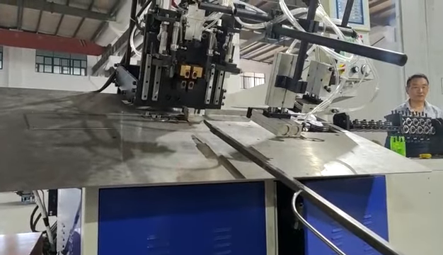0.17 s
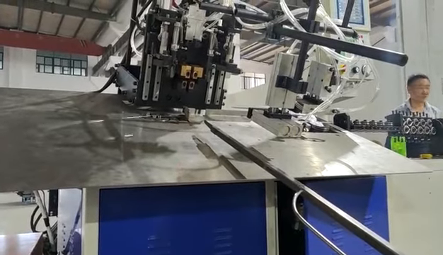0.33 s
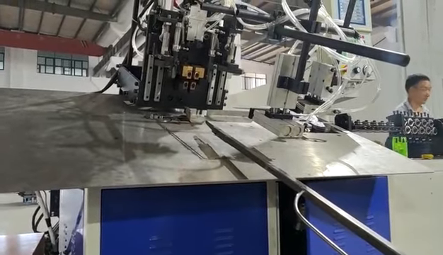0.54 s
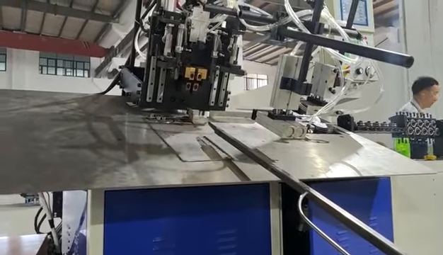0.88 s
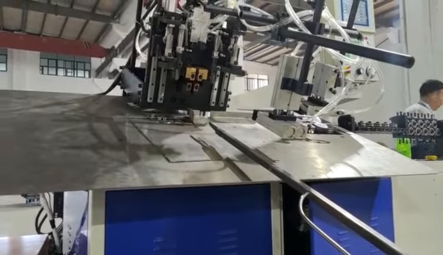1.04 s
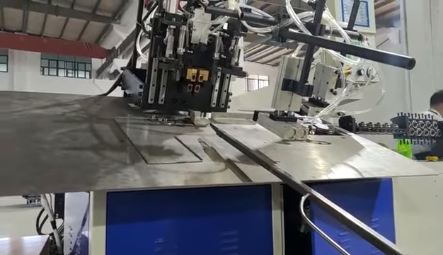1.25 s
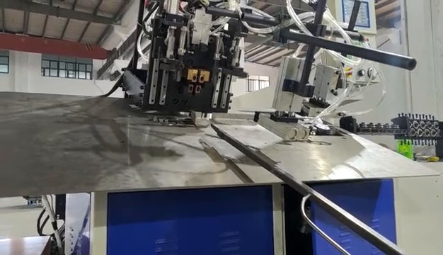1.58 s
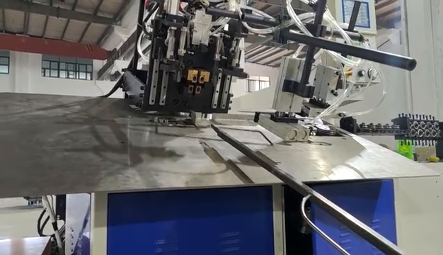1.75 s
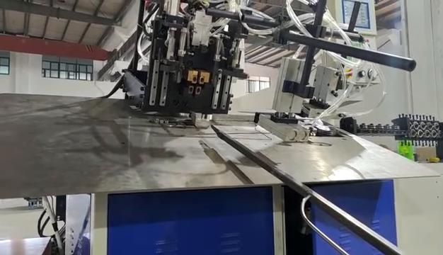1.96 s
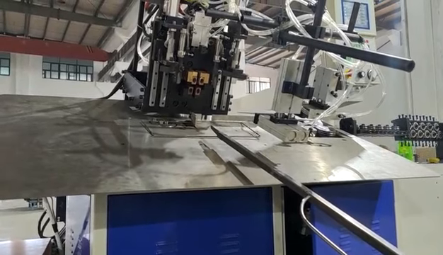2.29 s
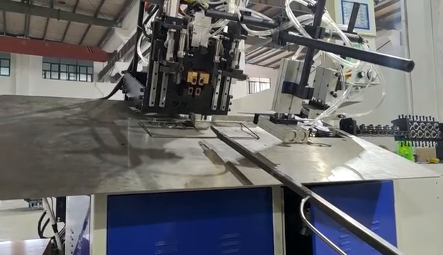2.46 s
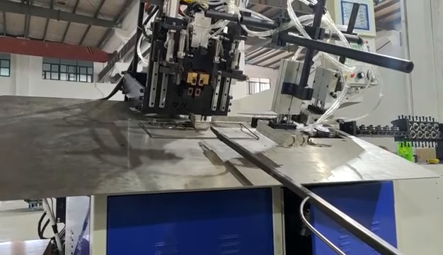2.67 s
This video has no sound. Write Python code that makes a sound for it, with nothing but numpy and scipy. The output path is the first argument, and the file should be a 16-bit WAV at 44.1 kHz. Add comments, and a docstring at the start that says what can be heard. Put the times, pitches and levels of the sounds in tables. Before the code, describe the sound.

Steel parts clink and heads rattle lightly over a low factory drone; after a calmer stretch the bending machine clanks hard and repeatedly, motors hum briefly, and a buzzing air exhaust whistles downward, heard fairly close in stereo.

```python
"""A large factory hall, where a wire bending machine works a few metres from a small stereo microphone.
Shaped noise and fuzzy hums make the hall's drone, and faint scattered rings its far clatter; filtered noise
is the hiss of compressed air, and narrow noise bands are the drive motors. Small steel parts clink as decaying
sines, and the heads clank against their stops as rattles through the frame's resonances over low thuds. At
the end an exhaust jet, a falling band of noise, whistles downward while the frame buzzes."""
import sys
import numpy as np
from scipy import signal
from scipy.fft import rfft, irfft
from scipy.io import wavfile
from scipy.ndimage import uniform_filter1d

SR = 44100
rng = np.random.default_rng(int(sys.argv[2]) if len(sys.argv) > 2 else 0)


def transcribe(signal):
    """Save signal, clipped to [-1, 1], as a 16-bit WAV file at the path in sys.argv[1]."""
    frames = np.atleast_2d(signal).T
    limited = np.clip(frames, -1, 1)
    pcm = np.round(limited * 32767).astype(np.int16)
    wavfile.write(sys.argv[1], SR, pcm)


N = 124803  # samples


def amp(db):
    """Decibels to an amplitude factor."""
    return 10 ** (np.asarray(db) / 20)


def evened(x):
    """Scale to an RMS of 1."""
    return x / np.sqrt(np.mean(x ** 2) + 1e-20)


def read(points, hz):
    """Read a table over frequency, in straight lines on a log scale."""
    point_hz, value = np.transpose(points)
    return np.interp(np.log(hz + 1), np.log(point_hz + 1), value)


def curve(rows, col):
    """One column of a time table, sample by sample."""
    rows = np.array(rows)
    return np.interp(np.arange(N) / SR, rows[:, 0], rows[:, col])


def sides(pan_db):
    """Left and right gains; a positive pan leans left."""
    return amp(np.array([[pan_db], [-pan_db]]) / 2)


def resonate(x, hz, width):
    """A resonance of gain 1 that follows hz: shift the band to zero, smooth it, shift it back."""
    turn = np.exp(2j * np.pi * np.cumsum(hz * np.ones(x.shape[-1])) / SR)
    r = np.exp(-np.pi * width / SR)
    return 2 * (turn * signal.lfilter([1 - r], [1, -r], x / turn)).real


def grain_sizes(shape, per_s, spread_db):
    """Sparse random impulses, some of them stronger."""
    boost_db = spread_db * np.minimum(rng.exponential(1, N), 2)
    return amp(boost_db) * (rng.random(N) < per_s / SR) * np.ones(shape)


# Left-right likeness of sound from all around. Each row: frequency in Hz, likeness from 0 to 1.
SAME = [(40, .999), (80, .997), (130, .988), (190, 0.965), (270, 0.9), (400, 0.81), (580, 0.53), (850, 0.2),
        (1300, 0), (8000, 0)]


def pair(hz, width):
    """A fuzzy tone: noise through two equal resonances, not quite alike left and right."""
    left, other = rng.standard_normal((2, N))
    same = read(SAME, hz)
    noise = np.array([left, same * left + np.sqrt(1 - same ** 2) * other])
    return evened(resonate(resonate(noise, hz, width), hz, width))


# Stereo lean, applied in full only where the sides are unlike. Each row: frequency in Hz, left minus right in dB.
LEAN = [(700, 0.5), (1300, -1), (2400, 2.5), (4450, -0.5), (5200, 1.5), (6500, 7), (7500, 6)]
# How strongly the patches show. Each row: frequency in Hz, share of the patch depth from 0 to 1.
PATCHY = [(300, 0.25), (1000, 0.81), (8000, 1)]


def diffuse(spectrum, side, patchy_db, flicker_db):
    """Stereo noise of a given colour with drifting patches and a shared flicker."""
    frames, hz = N // 512 + 5, np.fft.rfftfreq(2048, 1 / SR)
    a, b, c, d, patches = rng.standard_normal((frames, 1025, 5)).T
    # patches are smoothed over frequency, then over time
    patches = evened(uniform_filter1d(uniform_filter1d(patches, size=6, axis=0), size=5, axis=1))
    flicker = evened(uniform_filter1d(rng.standard_normal(frames), size=3))

    around = read(SAME, hz)
    one_side, lead_s = side
    same = (around + (1 - around) * one_side * np.exp(-2j * np.pi * hz * lead_s))[:, None]
    left, other = a + 1j * b, c + 1j * d
    z = np.array([left, same * left + np.sqrt(1 - abs(same) ** 2) * other])

    lean = (read(LEAN, hz) * (1 - around))[:, None] / 2
    colour_db = read(spectrum, hz)[:, None]
    patch_db = patchy_db * read(PATCHY, hz)[:, None] * patches
    z *= amp(colour_db + patch_db + flicker_db * flicker + np.array([lean, -lean]))
    return evened(signal.istft(z, nperseg=2048, noverlap=1536)[1][:, :N])


# Colour of the drone. Each row: frequency in Hz, relative density in dB per Hz.
HALL = [(18, -43.5), (30, -25), (64, -3.5), (141, -6.5), (257, -0.5), (309, -5), (408, -5.5), (577, -9),
        (633, -6.5), (816, -13), (1010, -17.5), (1490, -14.5), (3190, -20), (6090, -37), (7500, -35.5),
        (9750, -56), (16500, -120)]
# Slow swell of drone and hums. Each row: time in seconds, gain in dB.
HALL_LEVEL = [(0, -0.5), (.25, 0), (.5, 1), (.75, 1.5), (.9, 1.5), (1.1, 0.5), (1.25, -0.5), (1.55, 0),
              (1.7, -1.5), (1.8, 1), (1.9, 0), (2.1, 0.5), (2.2, -0.5), (2.3, -0.5), (2.55, 1.5), (2.68, 0),
              (2.83, 1)]
# Fuzzy motor hums. Each row: frequency in Hz, width in Hz, level in dB before the slow swell.
HALL_HUMS = [(117.8, 53, -32), (220, 39, -37.5), (264.4, 84, -33.5)]
# The share of the drone from one side, in this order: likeness from 0 to 1, lead of the left in seconds.
HALL_SIDE = (0.44, 0.00032)
HALL_DB = -22  # drone before the slow swell


def hall():
    """The drone of distant machines and fans as coloured noise, with a few fuzzy hums."""
    hums = sum(amp(db) * pair(hz, width) for hz, width, db in HALL_HUMS)
    drone = amp(HALL_DB) * diffuse(HALL, HALL_SIDE, patchy_db=2.54, flicker_db=0.77)
    return amp(curve(HALL_LEVEL, 1)) * (drone + hums)


CLATTER_PER_S, CLATTER_DB, CLATTER_SPREAD_DB = 250, -33.5, 4
CLATTER_LO_HZ, CLATTER_HI_HZ, CLATTER_T60 = 698, 7330, 0.17  # pitch range before scatter, ring in s


def clatter():
    """Far metal work: many faint rings of scattered pitch and side, louder when the air flows."""
    t, out = np.arange(5000) / SR, np.zeros((2, N))
    size = grain_sizes(N, CLATTER_PER_S, CLATTER_SPREAD_DB)
    pitches = np.geomspace(CLATTER_LO_HZ, CLATTER_HI_HZ, num=60) * rng.uniform(0.99, 1.02, size=60)
    which = rng.integers(0, len(pitches), N)
    pan_db = 8 * rng.uniform(-2.1, 1, len(pitches))  # more often to the right
    envelope = amp(-60 * t / CLATTER_T60) * np.minimum(t / 0.0037, 1)
    for k, hz in enumerate(pitches):
        ring = envelope * np.sin(2 * np.pi * hz * t)
        out += sides(pan_db[k]) * signal.oaconvolve(size * (which == k), ring)[:N]
    flow_db = curve(AIR_FLOW, 1)
    return amp(CLATTER_DB + .6 * (flow_db - flow_db.mean())) * evened(out)


# Colour of the hiss. Each row: frequency in Hz, relative density in dB per Hz.
AIR = [(530, -27.5), (900, -2), (1060, -27), (1240, -3), (1670, -8.5), (2070, -1), (2370, -3.5),
       (2680, -4.5), (3230, -3.5), (3720, -1), (4180, -5), (6860, -5), (7500, -2.5), (9750, -36.5),
       (16500, -120)]
# Flow of the air. Each row: time in seconds, level in dB before AIR_DB is added.
AIR_FLOW = [(0.0, -32), (0.09, -31.5), (0.12, -32.5), (0.42, -33.5), (0.44, -31), (0.54, -35.5),
            (0.55, -30), (0.61, -35), (0.62, -35), (0.68, -34), (0.72, -33), (0.79, -33.5), (1.02, -30.5),
            (1.56, -39.5), (1.73, -33.5), (1.76, -36), (1.77, -25.5), (1.97, -31), (2.11, -25), (2.14, -29),
            (2.38, -27.5), (2.4, -24.5), (2.6, -36), (2.64, -30.5), (2.81, -26.5), (2.83, -26)]
# The share of the hiss from one side, in this order: likeness from 0 to 1, lead of the left in seconds.
AIR_SIDE = (0.058, 0.00018)
AIR_DB = 8


def air():
    """Compressed air hissing through valves and hoses: turbulence as noise that follows the flow."""
    colour = [(300, -48.5), (700, -18)] + AIR  # the leading points thin out the low end
    return amp(AIR_DB + curve(AIR_FLOW, 1)) * diffuse(colour, AIR_SIDE, patchy_db=3.37, flicker_db=0.54)


# A drive motor droning while the heads travel.
# Each row: start in seconds, length in seconds, frequency in Hz, level in dB.
DRIVES = [(1.691, 0.12, 290, -25), (1.764, .1, 185, -28), (1.898, 0.094, 272, -21.5),
          (1.975, .11, 286, -26), (2.13, 0.12, 215, -21.5), (2.3, 0.074, 278, -25),
          (2.375, 0.195, 254, -27.5), (2.564, 0.074, 243, -26.5), (2.778, 0.13, 239, -25)]
DRIVE_WIDTH, DRIVE_EDGE_S = 33, 0.042  # Hz, fade in and out in s


def drives():
    """A wavering low tone, narrow noise, that swells in and out with each move."""
    t, out = np.arange(N) / SR, np.zeros((2, N))
    for start, length, hz, db in DRIVES:
        to_nearest_end = np.minimum(t - start, start + length - t)
        swell = np.clip(to_nearest_end / DRIVE_EDGE_S, 0, 1)
        out += amp(db) * swell * pair(hz, DRIVE_WIDTH)
    return out


# Small steel parts. Each row: start in seconds, level in dB, pan in dB (left minus right), pitch ratio.
CLINKS = [(.1145, -20.5, 13.5, 1.0), (.119, -23.5, 3.5, 1.14), (.127, -28, 6, 1.2), (.1345, -22.5, 1, 1.01),
          (.139, -33, 1, 1.01), (.548, -31, 8, 1.0)]
# Ring of one part. Each row: frequency in Hz at pitch ratio 1, relative level in dB, 60 dB decay in seconds.
CLINK_MODES = [(2632, -1, .14), (2760, -5, .06), (2920, -6, .06), (3150, -12, .04), (3300, -7, .05),
               (3450, -1, .08), (3600, -3, .05), (3900, -14, .04), (4150, -14, .04), (5750, -8, .05),
               (6250, -6, .07), (6700, -10, .04)]
# Single light ticks. Each row: start in seconds, level in dB, pan in dB (left minus right), frequency in Hz.
TICKS = [(0.327, -24.5, 14, 6000), (0.331, -23, 7.5, 2980), (0.549, -25, 6, 5520), (.543, -22, 2, 6150),
         (.547, -18.5, 2, 2930), (.549, -22, 1, 3330), (.56, -24, 2, 3150), (.336, -23, 4, 6100),
         (.624, -29, 5, 4700), (.633, -24, 7, 2860), (.722, -29, 3, 4420), (.749, -27, 5, 4330),
         (1.795, -18, -7, 4100), (1.846, -18.5, 8.5, 5680), (2.01, -18, -7, 3650), (2.045, -15, -10, 3770),
         (2.083, -10.5, -3, 3760), (2.395, -14.5, 8.5, 2015)]
TICK_T60 = 0.037  # s


def clinks():
    """Each clink rings the same few decaying modes, a little higher or lower; a tick rings one."""
    out, t = np.zeros((2, N)), np.arange(6000) / SR
    blows = []
    for start, db, pan_db, ratio in CLINKS:
        blows.append((start, db, pan_db, [(hz * ratio, mode_db, t60) for hz, mode_db, t60 in CLINK_MODES]))
    for start, db, pan_db, hz in TICKS:
        blows.append((start, db, pan_db, [(hz, 0, TICK_T60)]))
    attack = np.minimum(t / 0.00068, 1)
    for start, db, pan_db, modes in blows:
        ring = sum(amp(mode_db - 60 * t / t60) * np.sin(2 * np.pi * (hz * t + rng.random()))
                   for hz, mode_db, t60 in modes)
        at = round(start * SR)
        out[:, at:at + len(t)] += amp(db) * sides(pan_db) * ring * attack
    return out


def frame(drive, bands):
    """Steel answers a drive with its resonances, summed with alternating sign."""
    out = 0
    for k, (hz, width, db) in enumerate(bands):
        even_width = np.sqrt(2 * np.pi * width / SR)  # keeps narrow bands as loud as wide ones
        out = out + (-1) ** k * amp(db) * resonate(drive, hz, width) / even_width
    return out


# Heads meeting their stops. Each row: start in seconds, level in dB, pan in dB (left minus right),
# rise in seconds, rattle decay constant in seconds, centre of the ring in Hz, thud level in dB, thud in Hz.
CLANKS = [(0.391, -24, -6, .01, 0.063, 3750, -35, 350), (0.436, -24.5, 5, 0.0043, 0.04, 4250, -32.5, 300),
          (0.468, -23, 3, .015, 0.033, 3200, -34, 300), (0.742, -25, 0, .008, 0.025, 3400, -33.5, 300),
          (0.714, -17.5, -3.5, 0.0065, 0.034, 3600, -27.5, 280),
          (1.698, -16.5, -3, 0.0021, 0.016, 2410, -21.5, 306),
          (1.766, -18, -6, 0.0043, 0.037, 3800, -15.5, 200),
          (1.765, -22, -0.5, 0.0028, 0.07, 5620, -31, 200), (1.804, -24, 4, .01, 0.075, 3900, -23.5, 640),
          (2.007, -15, 5.5, 0.0069, 0.035, 2170, -22, 246),
          (2.018, -17.5, -13, 0.011, 0.02, 3560, -20.5, 386),
          (2.048, -19, 5.5, 0.008, 0.022, 1850, -23.5, 300),
          (2.096, -21.5, -1, 0.006, 0.027, 2050, -28, 300),
          (2.079, -13.5, -3, 0.0034, 0.049, 3800, -26.5, 300),
          (2.197, -17, -4, 0.023, 0.054, 4250, -17, 205), (2.336, -20, 2, .005, 0.091, 3500, -27.5, 281),
          (2.393, -13.5, 2, .004, 0.031, 2100, -29, 280), (2.419, -20, 2, .006, 0.017, 1950, -30.5, 280),
          (2.455, -23, -1, .008, 0.015, 2300, -29, 280), (2.662, -19, 0.5, .012, 0.032, 1150, -18.5, 520),
          (2.705, -28, 3.5, .006, 0.017, 1200, -20.5, 570), (2.751, -19, 6, 0.0057, 0.037, 1400, -26, 284)]
# Ring of the frame. Each row: frequency in Hz, width in Hz, level in dB before weighting around the ring centre.
FRAME_MODES = [(1210, 15, -5), (1771, 29, -7), (2015, 120, -3.5), (2260, 85, -10.5), (2638, 38, -8),
               (3020, 140, -11), (3312, 88, -12.5), (3730, 37, -5.5), (4100, 49, -10.5), (4424, 48, -7),
               (4900, 200, -11.5), (6650, 85, -1)]
FIRST_BLOW_DB, RATTLE_PER_S, RATTLE_SPREAD_DB = 18.5, 1500, 4
THUD_WIDTH, RING_OCTAVES = 240, 0.77  # Hz, distance from the ring centre where modes drop 6 dB


def clanks():
    """A first blow and a dying rattle shake the frame modes near the ring's centre over a low thud."""
    grains = evened(rng.standard_normal((2, N)) * grain_sizes((2, N), RATTLE_PER_S, RATTLE_SPREAD_DB))
    low, out, t = rng.standard_normal(N), np.zeros((2, N)), np.arange(SR // 3) / SR
    for start, db, pan_db, rise, length, ring_hz, thud_db, thud_hz in CLANKS:
        at = round(start * SR)
        part = out[:, at:at + len(t)]
        n = part.shape[1]
        shape = (np.exp(-t / length) * np.minimum(t / rise, 1))[:n]
        modes = [(hz, width, mode_db - 6 * (np.log2(hz / ring_hz) / RING_OCTAVES) ** 2)
                 for hz, width, mode_db in FRAME_MODES]
        first_blow = amp(FIRST_BLOW_DB) * (t[:n] == 0)
        rattle = shape * grains[:, at:at + n]
        thud = resonate(resonate(low[at:at + n], thud_hz, THUD_WIDTH), thud_hz, THUD_WIDTH)
        part += amp(db) * sides(pan_db) * frame(rattle + first_blow, modes)
        part += amp(thud_db) * shape * evened(thud)
    return out


# The exhaust jet. Each row: time in seconds, whistle in Hz, level in dB.
JET = [(2.615, 7200, -24), (2.63, 7400, -24), (2.67, 7060, -23), (2.71, 6750, -22), (2.83, 6100, -22.5)]
# Ring of the muffler. Each row: frequency in Hz, width in Hz, level in dB before JET_RING_DB.
JET_MODES = [(6095, 30, -3), (6270, 30, -4), (6523, 20, 0), (6668, 25, -3), (6722, 20, 1), (6777, 25, -2),
             (6889, 30, -2), (7074, 20, -1), (7297, 30, -1), (7484, 30, -1)]
# Buzz of the frame. Each row: time in seconds, level in dB before a 6 dB cut.
BUZZ = [(2.6, -31), (2.614, -30), (2.624, -17), (2.82, -21.5), (2.83, -25)]
# Colour of the buzz. Each row: frequency in Hz, width in Hz, relative level in dB.
BUZZ_BANDS = [(482, 440, -12), (1170, 210, -2), (1800, 51, -8), (2015, 39, 3), (2140, 69, -1),
              (2310, 100, 0), (3800, 300, -9), (5100, 200, -13.5)]
JET_WIDTH, JET_PAN_DB, JET_RISE_S, JET_RING_DB = 920, 6.5, 0.008, -16.5  # width in Hz


def exhaust():
    """A jet of air whistles in a broad falling band that rings the muffler while the frame buzzes along."""
    gate = np.clip((np.arange(N) / SR - JET[0][0]) / JET_RISE_S, 0, 1)
    hz, noise = curve(JET, 1), rng.standard_normal((4, N))
    whistle = evened(resonate(resonate(noise[:2], hz, JET_WIDTH), hz, JET_WIDTH))
    jet = gate * whistle * amp(curve(JET, 2)) * sides(JET_PAN_DB)
    muffler = amp(JET_RING_DB) * frame(jet, JET_MODES)
    buzz = gate * amp(curve(BUZZ, 1) - 6.0) * frame(noise[2:], BUZZ_BANDS)
    return jet + muffler + buzz


ROOM_T60, ROOM_DB = 0.54, -10.5  # s, level of the tail


def room(x):
    """A decaying tail of random reflections, alike on both sides in the bass."""
    t = np.arange(SR // 2) / SR
    decay = amp(-60 * t / ROOM_T60) * (t > .008)
    left, other = rfft(rng.standard_normal((2, len(t))) * decay)
    same = read(SAME, np.fft.rfftfreq(len(t), 1 / SR))
    tail = irfft([left, same * left + np.sqrt(1 - same ** 2) * other], len(t))
    return signal.fftconvolve(x, tail / np.linalg.norm(tail[0]), axes=1)[:, :N]


def scene():
    """Every layer together; only clinks and clanks feed the room."""
    hits = clinks() + clanks()
    background = hall() + clatter() + air() + drives()
    return background + hits + amp(ROOM_DB) * room(hits) + exhaust()


CEILING, EDGE_HZ = 1.1, 7510  # peak limit as amplitude, band limit


def record(dry):
    """The recorder rounds off the loudest peaks and filters out what lies above its band limit."""
    rounded = CEILING * np.tanh(dry / CEILING)
    low_pass = signal.firwin(1023, EDGE_HZ, window=("kaiser", 11), fs=SR)
    return signal.oaconvolve(rounded, low_pass[None], "same")


dry = scene()
out = record(dry)
transcribe(out)
```